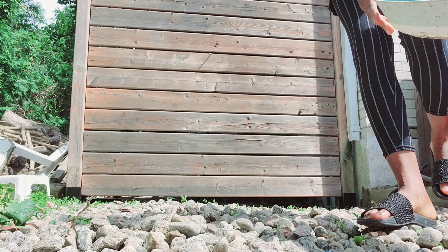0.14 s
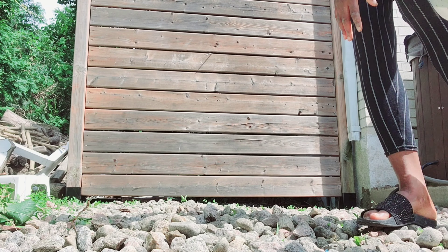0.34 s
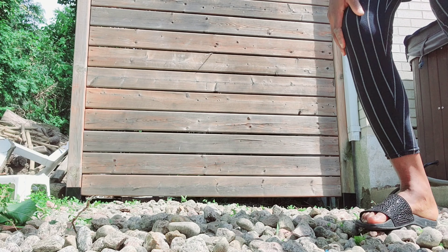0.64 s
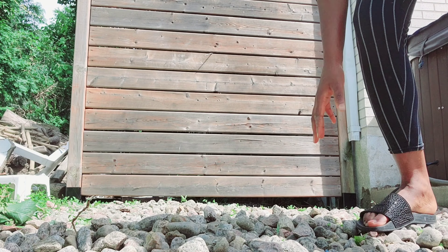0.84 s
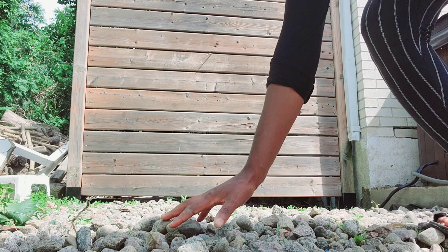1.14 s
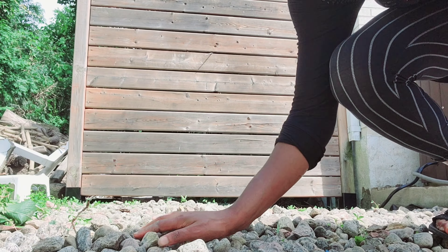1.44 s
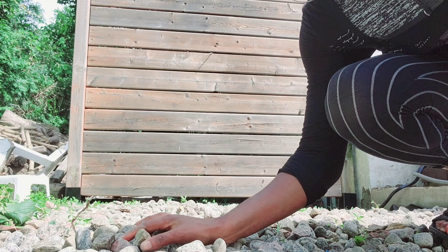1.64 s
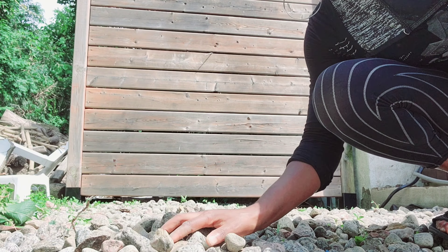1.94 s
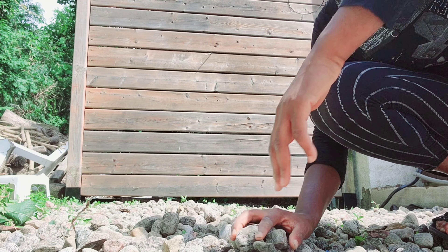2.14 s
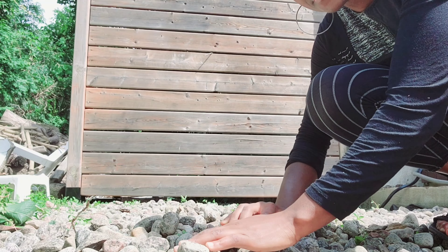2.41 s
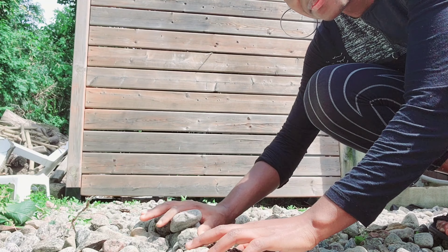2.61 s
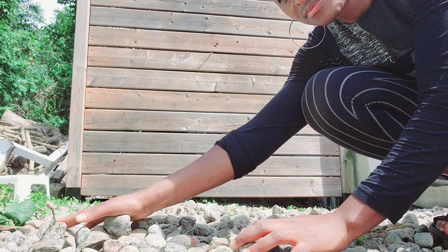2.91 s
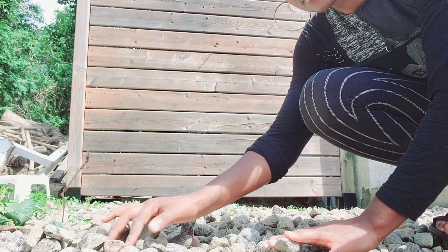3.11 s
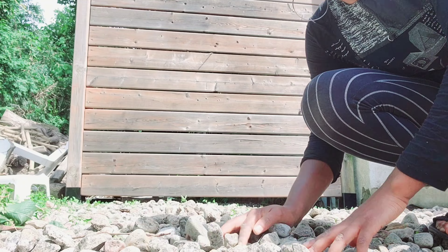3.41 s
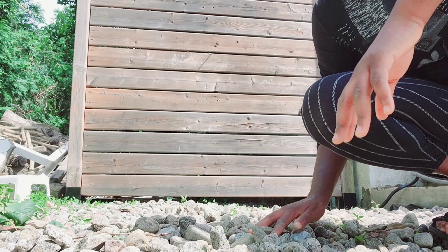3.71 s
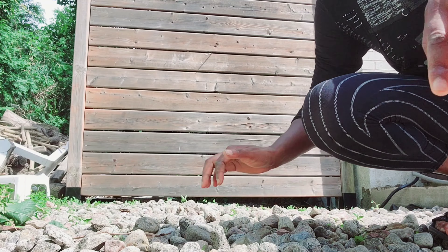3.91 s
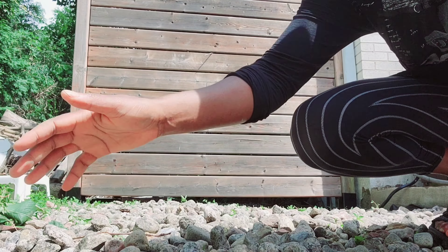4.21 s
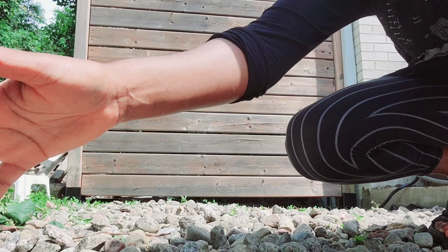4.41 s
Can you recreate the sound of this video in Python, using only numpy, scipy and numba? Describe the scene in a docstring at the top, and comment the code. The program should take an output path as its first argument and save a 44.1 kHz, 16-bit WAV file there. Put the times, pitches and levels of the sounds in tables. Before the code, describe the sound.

Close gravel crunches, a hollow plastic basin knocks down on it, and bare hands sweep the clicking stones before a quiet end outdoors.

```python
"""Gravel, basin and bird

Outdoors, a phone lies on coarse gravel. A sandal shifts the stones, an empty plastic basin is set down and rocks,
then hands rake the stones. A bird whistles once over distant low rumble; later a faint tone sounds.
Stones and basin are decaying sines; grit and air are shaped noise; bird and faint tone are gliding sines.
"""
import sys
import numpy as np
from scipy import signal
from scipy.fft import rfft, irfft, next_fast_len
from scipy.io import wavfile
from scipy.ndimage import uniform_filter1d
from numba import njit

SR = 44100
rng = np.random.default_rng(int(sys.argv[2]) if len(sys.argv) > 2 else 0)


def output_pcm(signal):
    """Save a mono or channel-first signal as 16-bit PCM at the path in sys.argv[1].

    Samples are clipped to [-1, 1] before scaling.
    """
    pcm = np.clip(np.atleast_2d(signal).T, -1, 1) * 32767
    wavfile.write(sys.argv[1], SR, np.round(pcm).astype(np.int16))


N = 200765

# clear stone knocks: start_s (before KNOCK_DELAY_S), level_db, ring_hz,
# tick_minus_level_db (high tick, after the microphone), left_minus_right_db, chatter_minus_level_db, left_lead_ms
KNOCKS = [(0.241, -58, 5500, -25, 3, -12, 0.2), (0.2873, -50.5, 3300, -19.0, 7, -5, 0.27),
          (0.2918, -51.0, 2170.0, -21.0, 3, -14.0, 0.23), (0.3171, -46, 7240.0, -19.0, 7, -14.0, 0.38),
          (0.3436, -38, 5900, -33.0, 7, -19, 0.02), (0.3693, -49, 7260.0, -21.0, 5.0, -12, 0.56),
          (0.3917, -37, 5800, -28.0, 7, -9, 0.02), (0.4058, -40.5, 5930, -29, 12, -8, -0.063),
          (0.4565, -53, 7260.0, -25.0, 12, -17, 0.091), (0.4677, -45.5, 1800, -29.0, 1, 2, 0.33),
          (0.5271, -35.5, 1720.0, -32.0, 4, -20, 0.28), (0.5428, -33.5, 1965, -24.0, 4.5, -22, 0.38),
          (0.5484, -28, 5470, -34.0, 8, -19, -0.026), (0.57, -26, 3450.0, -30.0, 11, -15, -0.31),
          (0.5744, -22, 6240, -31.0, 6, -26, 0.25), (0.585, -16.5, 3240, -37.0, 5.5, -23, 0.26),
          (0.6094, -29, 3250.0, -26.5, 9, -24, 0.49), (0.6185, -30, 3490.0, -28.0, 11, -20, 0.53),
          (0.6427, -7, 5650, -32, 7, -9.5, 0.27), (0.6735, -38.5, 1310.0, -29.0, 10, -8, -0.45),
          (0.7114, -48, 6340, -25.0, 6, -10, -0.14), (0.7514, -38.5, 3600, -33.0, 7, -5, 0.35),
          (0.773, -38.5, 5320.0, -31.0, 3.0, -8, 0.0), (0.7797, -41.5, 3600, -28.0, 6.0, -12, 0.0),
          (0.806, -14, 5200, -32.0, 8, -11, 0.17), (0.8096, -13.5, 5190, -7, 0.5, -6.5, 0.21),
          (0.812, -27, 5200, -27.0, -2, -3, 0.51), (0.8147, -17, 5700, -23.0, 4, -30, 0.32),
          (0.8512, -42, 5210.0, -14, 1, -5, 0.41), (0.8572, -38, 3340, -34, 6, -17, 0.13),
          (0.8612, -38, 1960.0, -26.0, 2.0, -12, 0.24), (0.8646, -39, 3270.0, -31.0, 7, -12, 0.23),
          (0.874, -43, 5510.0, -32.0, -1, -16, 0.2), (0.8791, -34, 3200, -40.0, 6.0, -16, 0.14),
          (0.8836, -38.5, 3120.0, -36.0, 4, -15, 0.34), (0.8994, -47, 3250.0, -29.0, 2, -15, -0.11),
          (0.9248, -42.0, 7600, -37.0, 10, -14.0, 0.07), (0.9372, -33, 4660, -25.0, 4, -3.5, 0.2),
          (0.9468, -37, 7320.0, -38.0, 8, -9, 0.33), (0.9685, -24, 3300, -41.0, 4.5, -19, 0.23),
          (0.9873, -18.5, 5640, -32, 8.5, -14.5, 0.25), (1.0077, -18, 1600, -12, 6, -8.5, -0.079),
          (1.0138, -17, 7700, -16, 23, -23, 0.13), (1.0162, -22, 5660, -20.0, -6.5, -13, -0.12),
          (1.0477, -19.5, 5170, -24.0, 0, -11, 0.062), (1.0559, -25, 1380, -27.0, 7, -10, 0.63),
          (1.0724, -26.5, 1460.0, -25.0, 6.5, -8, 0.6), (1.1015, -22, 3790, -37.0, 2, -6.5, 0.0),
          (1.108, -23, 5640, -39.0, -1.5, -10, -0.54), (1.1508, -31, 4800.0, -22.0, 3.5, -19, -0.02),
          (1.1534, -24, 4800.0, -27.5, 1.5, -12, 0.37), (1.1559, -21, 4720.0, -31.0, 3.5, -14, 0.028),
          (1.1879, -34, 3640.0, -29, 3.5, -11.5, 0.02), (1.1928, -26, 4670.0, -23, 2, -13, 0.02),
          (1.1949, -35, 1875, -25, 4, -13.5, -0.15), (1.2014, -25, 2115, -31, 7.5, -15, 0.33),
          (1.2437, -10, 2083, -24, 2.5, -6.5, -0.15), (1.246, -9.5, 2410, -20, -9.5, -16.5, 0.4),
          (1.2493, -14, 1824, -26.5, -11.5, -19, 0.48), (1.259, -12.5, 2097, -37.5, 12, -11.5, -0.057),
          (1.2754, -13.5, 1470, -43.5, 4, -12.5, 0.52), (1.2937, -17, 1480, -40.0, 0.5, -15.5, 0.71),
          (1.3185, -27, 1470, -28.0, 0.5, -19, -0.064), (1.3194, -31, 1410, -30.0, 3.5, -12, 0.73),
          (1.33, -31, 1890.0, -32, 5, -14.0, 0.27), (1.3667, -10.5, 1745, -37, 13.5, -8.5, 0.23),
          (1.3954, -24.5, 3260, -29.0, 23, -12, 0.36), (1.4005, -23, 4960, -31.0, -8, -21, 0.0),
          (1.4036, -20, 5330, -28.0, 3.5, -9.5, 0.17), (1.4082, -27, 1340.0, -31.0, 7, -21, 0.68),
          (1.4141, -25.5, 4030, -30, 6.0, -22, -0.25), (1.4375, -24.5, 2090, -34.0, 8, -29, 0.26),
          (1.4475, -21, 1340.0, -34.0, 4, -19, 0.37), (1.4582, -21.5, 1470, -33.0, 10, -19, -0.089),
          (1.5002, -32, 2040, -41.0, 6, -11, 0.38), (1.5077, -29, 1810.0, -36.0, 6, -1.5, 0.14),
          (1.5116, -34.5, 1540, -35.0, 4, -2, 0.4), (1.5265, -40, 2370, -37.0, 4, -11, 0.085),
          (1.531, -35.5, 2200.0, -40.0, 3, -5, 0.58), (1.5389, -37, 2220.0, -40.0, 11, -19, 0.45),
          (1.5432, -41, 1420.0, -38.0, -2, -16, 0.56), (1.5663, -35, 1310.0, -30.0, 5, -13, 0.54),
          (1.5711, -48, 1310.0, -34.0, 11, -17, -0.52), (1.5974, -42, 2000, -37.0, 11, -6, 0.53),
          (1.6017, -43.5, 1340.0, -36, 2, -12, 0.3), (1.6097, -36, 1360.0, -34.0, 7, -10, -0.33),
          (1.615, -39, 1380.0, -32.0, 9, -9, -0.51), (1.6285, -42, 5190.0, -36.0, 0.0, -18, 0.021),
          (1.6478, -30.5, 1600, -40.0, -0.5, -4.5, 0.12), (1.6557, -24, 4870.0, -43, 4.0, -23, 0.0),
          (1.6575, -27, 3740, -29.5, 9, -17, -0.41), (1.6605, -37.5, 5660, -26, 5, -16, 0.044),
          (1.6875, -8, 7500, -17.5, 1, -11.5, 0.0), (1.7126, -27, 1680.0, -27.5, 5, -29, -0.14),
          (1.7189, -25.5, 1680.0, -34, -3, -18.5, -0.11), (1.723, -34, 3700, -34.0, 3, -18, 0.3),
          (1.7376, -30.5, 1680.0, -38.0, -1, -18, -0.063), (1.7412, -26, 3060, -38.0, -7, -18, -0.025),
          (1.7439, -25.5, 3500, -37.0, 9, -19, 0.15), (1.7461, -40, 4940, -32.0, 1, -20, -0.17),
          (1.7486, -36, 3120.0, -38.0, 1.0, -14.0, 0.3), (1.7626, -37, 5510.0, -32.0, 0, -21, 0.56),
          (1.771, -27.5, 3640.0, -39.0, -2, -6, 0.12), (1.7738, -26.5, 1570.0, -37.0, -1, -13.5, 0.24),
          (1.7924, -40, 5400, -36.0, 1.0, -14.0, -0.02), (1.7993, -43, 5510.0, -31.0, 0, -14.0, -0.23),
          (1.8056, -40, 5300, -29.0, -6, -14.0, -0.084), (1.8095, -36, 5490.0, -25.0, -1, -16, 0.1),
          (1.8231, -31, 2800.0, -34.0, 2.0, 3, 0.059), (1.8327, -19, 5500, -36.0, -0.5, -10, -0.02),
          (1.8353, -21.5, 5500, -37.0, 7, -21.5, 0.0), (1.8464, -28, 1610.0, -33.0, -5, -17, -0.52),
          (1.8505, -20, 5810.0, -31.0, 8, -8.5, -0.028), (1.8613, -22.5, 5030, -31.0, -4, -12, 0.017),
          (1.8648, -22.5, 5360.0, -27.0, 0, -15.5, -0.24), (1.8696, -37.5, 2330, -34.0, -3, -18, 0.0),
          (1.8801, -29, 5320, -36.0, 6.5, -2, 0.0), (1.8849, -26, 3830.0, -22.0, 11, -7, 0.26),
          (1.8932, -25, 5230, -29.0, 1, -14, -0.4), (1.8956, -23, 5400, -31.0, 0, -9, 0.0),
          (1.8985, -21, 5230.0, -34.0, -7, -11, -0.05), (1.9042, -16, 6330.0, -26.0, 12, -12, -0.16),
          (1.91, -17, 5540, -30.0, 3.0, -19, -0.0039), (1.9126, -15, 4400, -34.0, -2, -26, 0.0),
          (1.9161, -13, 5300.0, -25.0, -4, -25, 0.46), (1.9353, -17.5, 5420, -28.0, 13.5, -7, 0.52),
          (1.9542, -9, 5470.0, -36.0, -18, -56, -0.07), (1.9589, -18.5, 5550, -32.5, 17, -18, -0.26),
          (1.9852, -22, 5020.0, -31.0, -4, -10.5, 0.32), (2.0014, -20.5, 7020.0, -24.0, 4.5, -12, 0.09),
          (2.0044, -12, 4930, -34.0, 4, -5.5, 0.05), (2.0165, -15, 4770, -28.0, 4, -10, 0.1),
          (2.0204, -14, 5400, -30.0, 1, -11.5, 0.05), (2.0485, -18.5, 2990.0, -45.0, 0.5, -9, 0.097),
          (2.0536, -20.5, 4800.0, -37.0, 4, -14.0, 0.09), (2.0639, -17, 3190.0, -35.0, 9.5, -15, 0.047),
          (2.0745, -9, 5350, -37, 2, -21.5, 0.11), (2.0768, -10, 4800, -24, 2, -7, 0.09),
          (2.1071, -25, 3600.0, -36.0, -2, -5, -0.0067), (2.1092, -17.5, 3140, -39.0, 7, -27, 0.081),
          (2.1117, -16.5, 7100, -34.0, 7, -9.5, 0.017), (2.1153, -23, 5370, -26.0, -2, -10, 0.09),
          (2.1211, -16.5, 2180, -43.0, 4, -8.5, 0.11), (2.1534, -23.5, 1420.0, -40.0, 3, -14.0, 0.26),
          (2.1568, -33.5, 5360.0, -32.0, 3.0, -22, 0.0092), (2.1624, -33.5, 2480.0, -36.0, 11, -7, 0.14),
          (2.1671, -28.5, 1480, -34.0, -2, -2, 0.18), (2.1732, -42, 2580.0, -38.0, 0, -19, 0.39),
          (2.1822, -42, 2540.0, -45.0, 9, -13, -0.2), (2.1851, -41, 2390.0, -40.0, 1, -19, -0.33),
          (2.1981, -32, 2050.0, -40.0, 3.0, -14.0, 0.2), (2.2001, -44, 2890.0, -42.0, 3.0, -14.0, 0.27),
          (2.2142, -40, 3100.0, -32.0, 3, -14.0, 0.04), (2.2242, -22, 5380.0, -27.0, 2.5, -10, 0.13),
          (2.2445, -29.5, 5400, -36.0, 5, -14.0, 0.11), (2.2702, -30, 2700, -29.0, 6, -16, 0.17),
          (2.2766, -31.5, 4260.0, -27.0, 2, -15, 0.27), (2.2875, -27.5, 7560, -24.0, 9, -16, 0.07),
          (2.3015, -30, 3220, -37.0, 1, -7, -0.071), (2.3094, -24.5, 3080, -42.0, 9, -26, 0.097),
          (2.3289, -19.5, 5300, -34.0, 7.5, -24, 0.11), (2.3469, -17, 2950, -39.0, -1.5, -5, 0.23),
          (2.3494, -16, 5300, -31, 7.5, -10.5, -0.29), (2.357, -22.5, 3000, -42.0, 13.5, -31, 0.11),
          (2.3753, -23.5, 6000, -33.0, 1, -6, 0.44), (2.3783, -28, 5940.0, -37.0, 6, -14.0, 0.12),
          (2.3901, -21, 5760, -32.0, 4.0, -17, 0.32), (2.4051, -18, 4800, -40.0, 5, -29, 0.02),
          (2.4078, -15, 1640, -35.0, -5, -12.5, 0.2), (2.416, -7, 4740, -45, 5.5, -27.5, -0.099),
          (2.4269, -20, 2650, -38.0, 5, -4, 0.091), (2.4411, -16.5, 2980, -41.0, 2.0, -8, 0.18),
          (2.4463, -19.5, 3020, -29.0, 5, -5, 0.061), (2.462, -12, 5200, -33, 4, -14, 0.0),
          (2.469, -26, 7000, -16, 2, -8, 0.0), (2.488, -5, 5350, -32, 2, -10, -0.076),
          (2.498, -27, 2950, -24.0, -1, -13, -0.021), (2.5131, -20, 5040.0, -26.0, -1.5, -1.5, -0.02),
          (2.5204, -21, 7450.0, -30.0, 1.5, -22, 0.16), (2.5443, -35.5, 3900.0, -26.0, -4, -12, 0.0),
          (2.5697, -13.5, 5830, -0.5, 6.5, -9.5, 0.16), (2.596, -19, 5200, -30, 1, -6.5, -0.3),
          (2.6011, -19.5, 3100, -27.0, 6, -8.5, -0.042), (2.6067, -18.5, 5920, -35.0, 2, -13.5, -0.026),
          (2.6103, -26.5, 4390.0, -32.5, 4, -12.5, -0.11), (2.6286, -28, 1555, -34.5, 1.0, -11, -0.24),
          (2.6321, -27, 5900, -25, 5, -25.5, 0.07), (2.6595, -20, 2600, -22.0, 2.0, -12.5, 0.067),
          (2.6721, -7.5, 6000, -25, -1.5, -19.5, 0.0), (2.6846, 0.5, 6270, -18.5, 10.5, -10.5, -0.085),
          (2.6921, -5, 5600, -21.5, -5.5, -12, -0.07), (2.7019, -17.5, 5000, -24, 2, -12, 0.0),
          (2.7055, -23, 5800, -26, 2, -9, 0.0), (2.741, -36, 2110.0, -28.0, 0.0, -16, 0.0),
          (2.746, -45, 2280.0, -14.0, 1, -14.0, -0.041), (2.7481, -37, 1400.0, -24.0, 1.5, -5, -0.056),
          (2.7782, -20.5, 5640, -26, 3, -6.5, -0.09), (2.8015, -29, 4610.0, -37.0, 3, -9, -0.02),
          (2.8202, -13.5, 5310, -31, 2.5, -10.5, 0.09), (2.8256, -26.5, 5580, -34.0, 1, -14, -0.13),
          (2.828, -22.5, 4140, -30.0, 1, -17, 0.13), (2.8596, -18.5, 4910.0, -31.0, -0.5, -17, -0.11),
          (2.8676, -27, 7180, -28.0, 18, -14.5, 0.45), (2.8731, -27.5, 4910, -26.0, 1.5, -21, -0.029),
          (2.882, -28, 5510.0, -17.0, 3.5, -14.0, -0.19), (2.887, -22.5, 5380.0, 14, 0, -21.5, -0.34),
          (2.8998, -26.5, 4570.0, -27.0, -1, -18, 0.077), (2.9058, -21.5, 5560.0, -27.0, 3, -6, -0.00029),
          (2.911, -12.5, 4430, -0.5, 4, -18, 0.14), (2.9158, -19, 3400.0, -35.0, 7.5, -16.5, 0.15),
          (2.9246, -21.5, 5510.0, -30.0, 2.5, -3, -0.07), (2.9491, -20, 3730.0, -29, 1.0, -14, 0.051),
          (2.9509, -23, 5120, -31.0, 0, -14.5, 0.23), (2.9594, -24, 4240.0, -35.5, 11, -9, -0.28),
          (2.965, -21.5, 750, -45, 1.5, -17.5, 0.0), (2.9716, -28.5, 2250, -33.0, 2.5, -18, -0.14),
          (2.977, -21, 4820.0, -28.0, -2.5, -16, -0.09), (2.9838, -19.5, 5640.0, -37.0, 1, -15, -0.11),
          (2.9907, -22.5, 4800, -29, 4.5, -14.5, 0.19), (3.0074, -18.5, 5620.0, -34.5, 8.5, -23.5, 0.094),
          (3.0217, -30.5, 5340.0, -25, 7, -17, -0.004), (3.0323, -40.5, 5840.0, -34, 1, -13.5, -0.24),
          (3.0377, -32.5, 5080.0, -22.5, 7, -20.5, -0.07), (3.046, -34.5, 4500, -37, 2, -15, 0.0),
          (3.0599, -10.5, 5230.0, -28.5, 4.5, -20, -0.078), (3.062, -8.5, 5560, -33.5, -0.5, -20.5, -0.02),
          (3.0666, -16, 5990.0, -23.5, -1.5, -16, -0.17), (3.0791, -6.5, 5680, -24, -6.5, -14.5, 0.16),
          (3.0907, -15, 4820.0, -24.5, 4, -16.5, 0.015), (3.1055, -21.5, 5530.0, -31, 3.5, -17, 0.0),
          (3.1118, -27, 4220, -32, 1.5, -14.5, -0.05), (3.1215, -23.5, 5570, -26, 1, -14.5, -0.05),
          (3.137, -21.5, 5200, -34, 0, -13.5, 0.0), (3.144, -26, 5400, -34, 0, -14, 0.0),
          (3.1531, -4, 4870.0, -43, -1, -21, 0.0), (3.1664, -13.5, 5770.0, -27, 5, -13, 0.0),
          (3.1787, -16, 4820, -29.5, 1, -12.5, 0.2), (3.1822, -16, 5960.0, -27.5, 0, -15.5, 0.0),
          (3.1893, -14, 3750.0, -22.5, 1, -13, 0.0), (3.2015, -13, 4810, -34.5, 5, -12, 0.095),
          (3.2065, -18, 4600, -36.0, 6.5, -15.5, -0.4), (3.2207, -21, 4440.0, -25, 1.5, -9, 0.09),
          (3.2239, -26, 1360.0, -23.0, 0, -15, -0.07), (3.2308, -33, 2220.0, -32.0, 0.5, -14.0, 0.09),
          (3.2337, -28.5, 3040.0, -34.0, 8, -14.5, 0.11), (3.2382, -28, 3570.0, -31.0, 6.5, -14, 0.098),
          (3.2598, -28, 2300, -40.0, 2, -8, -0.038), (3.2624, -26, 4560, -41.0, 5.5, -19.5, 0.05),
          (3.2671, -31.5, 4520.0, -18.0, 5, -18, -0.37), (3.284, -31.5, 5600.0, -39.0, 3.5, -11, 0.34),
          (3.2874, -27, 5695, -36, 0, -15, 0.0), (3.2895, -24, 5600.0, -34.0, 2.5, -8, -0.065),
          (3.2987, -28, 5600.0, -33.0, 2.5, -12.5, 0.016), (3.3009, -31.5, 5710.0, -29.0, 9, -14.0, -0.029),
          (3.3083, -28, 2040, -33.0, 7, -20, 0.18), (3.3105, -17.5, 4870.0, -29.0, 5, -13, -0.12),
          (3.3138, -27, 5520, -30.0, 1.5, -17, 0.02), (3.3336, -31, 1590.0, -35.0, 1, -7, -0.086),
          (3.3424, -33, 2780.0, -43, 0, -2, 0.009), (3.3465, -25.5, 2480.0, -46.0, 2, -5, 0.1),
          (3.3535, -34, 2390.0, -37.0, 2.0, -16, 0.0039), (3.3554, -30.5, 2450.0, -33.0, 2, -14.0, 0.049),
          (3.358, -32.0, 2030, -35.0, 5, -11, 0.11), (3.3748, -29, 3040, -34, 1, -2, -0.02),
          (3.3916, -34, 2340, -37.0, 1, 8.5, -0.13), (3.4, -16.5, 7300, -23, 5, -25, 0.05),
          (3.4205, -17, 4650, -28.0, 1, -4.5, 0.07), (3.4258, -22.5, 3040.0, -30, 7, -22, -0.68),
          (3.4556, -21, 2200.0, -49.0, 0.0, -8, -0.047), (3.4632, -32, 3780, -42.0, 5.0, -18, 0.02),
          (3.4867, -29.5, 2170.0, -37.0, 5, -7, 0.087), (3.4976, -24.5, 5710.0, -28.0, 6, -8.5, 0.05),
          (3.4999, -29, 2330.0, -28.0, 11, -16, 0.19), (3.5027, -27, 4870.0, -32.0, 3.0, -14.0, 0.1),
          (3.5188, -26, 2480, -29.0, 1, -17, 0.17), (3.5226, -21, 3230, -41.0, 10.5, -5.5, -0.27),
          (3.548, -32.5, 2400, -34.0, 8, -12, 0.072), (3.5634, -16, 5600, -38, 1.5, -2, 0.09),
          (3.5679, -38, 5340, -30.0, 1, -15, 0.44), (3.5709, -22.5, 5460, -29, 6.5, -13.5, -0.17),
          (3.5924, -25.5, 3680, -37.0, 2, -11, 0.11), (3.6007, -43, 3060.0, -33.0, 2, -14, 0.086),
          (3.6052, -34, 4850, -25, 3, -6, 0.66), (3.6104, -33.5, 6100, -25.0, 8, -16, 0.0),
          (3.6358, -54, 2540.0, -30.0, 2, -17, 0.2), (3.6622, -53, 3790.0, -31.0, 7, -14.0, -0.23),
          (3.7109, -44.5, 2300, -56.0, 2.5, 2.5, -0.004), (3.7155, -40, 2160, -51.0, 11, -25, -0.21),
          (3.7463, -59, 1380.0, -35.0, 4.0, -14.0, 0.11), (3.7574, -46, 1490.0, -32.0, 7.5, -20, 0.039),
          (3.7595, -55.0, 1380.0, -36.0, -1, -16, 0.0), (3.777, -47, 2220.0, -41.0, 5.0, -17, 0.0076),
          (3.7894, -40.5, 2500, -39.0, 5, -13, 0.17), (3.7963, -49, 5600, -31.0, 6, -1, 0.11),
          (3.8172, -47, 1310.0, -35.0, 5, -14.0, 0.0039), (3.83, -45.5, 2200.0, -41.0, 1, -19, 0.098),
          (3.8335, -60, 2110.0, -37.0, 5.0, -14.0, 0.02), (3.8358, -52, 2150.0, -37.0, 15, -18, 0.36),
          (3.8498, -49.5, 1420.0, -37.0, 1, -20, 0.054), (4.2718, -53.5, 3350, -23, 6, -16, -0.028),
          (4.3183, -56, 5160, -22.5, 3.0, -6, -0.012), (4.4286, -59, 5700, -21, 0, -14.0, 0.2),
          (4.4631, -46, 5540, -17, 10, -10, 0.0), (4.4763, -39, 3400, -35, 4, -30, -0.073),
          (4.5081, -52, 1930, -36, 11, -11, 0.23), (4.5161, -50, 2480.0, -30, 3.5, -16, 0.21),
          (4.5313, -50.0, 5680.0, -29.0, 1.0, -6, 0.44), (4.5384, -45, 5190.0, -27.0, 3.0, -14, 0.34)]
# blows on the basin: start_s, level_db, hardness_db_per_octave, spot_db (drive of second minus first rim mode),
# pitch_shift_percent (pressed shell)
BLOWS = [(1.006, -22.5, -4.5, 1.5, 1.5), (1.053, -32, -3.5, -9.5, 2.3), (1.1, -35, -1.5, -8, 4.5),
         (1.233, -30.5, 3, -17.5, -4.5), (1.2437, -21.5, 6.5, 2.5, -0.5), (1.258, -30.5, -3.5, -14.5, 0),
         (1.276, -31.5, 7.5, 2, 0.1), (1.294, -26.5, 3.5, -22, -1.6), (1.349, -23.5, -5.5, -5, -1.5),
         (1.366, -22.5, -7, -4, 0.1), (1.396, -36, -8, -17, 2), (1.438, -29, 0.4, 12, -0.45),
         (1.459, -35.5, -0.5, -6, -0.5), (1.505, -41, -10.5, -12, 1.7), (1.527, -37, 0, 9, 1),
         (1.567, -42.5, -1, 7, 2.5)]
# basin modes: pitch_hz, level_db, free_t60_s, left_lead_ms, rim_side (-1 first of the pair, 1 second)
BASIN_MODES = [(150, -16.5, 0.032, .3, -0.36), (222, -9, 0.041, 0.33, 0), (491, -7, 0.32, 0.54, -1),
               (878, -2, 0.26, 0.47, 1), (581.4, -5, 0.092, 0.18, 0), (657, -12, 0.063, 0.54, 0),
               (900, -14.5, 0.18, 0.64, 1), (1309, -9.5, 0.073, 0.32, 0), (1474, -2.5, 0.09, 0.49, 0.23),
               (1600, -14, 0.026, 0.24, 0), (1820, -8, 0.1, .52, 0), (1950, -7, .05, 0.52, 0),
               (2090, 6.5, 0.017, .6, 0), (2250, -15, .05, .45, 0), (2960, -16, 0.03, .4, 0),
               (2430, -16, 0.08, 0.55, 0)]
# bird whistle: time_s, pitch_hz, level_db
BIRD = [(0.512, 8500, -68), (0.53, 8600, -60), (0.58, 8660, -63), (0.635, 8700, -48), (0.67, 9060, -55),
        (0.73, 8700, -59), (0.8, 8690, -56), (0.86, 8600, -59), (0.895, 8550, -60), (0.925, 7740, -57),
        (0.952, 7200, -49), (0.985, 7440, -52)]
# faint tone: time_s, pitch_hz, level_db
FAINT_TONE = [(3.76, 1080, -67), (3.8, 1044, -63), (3.83, 1035, -80), (3.87, 1031, -67), (3.95, 1037, -68),
              (4.03, 1034, -70)]
# spectrum of the air, relative: freq_hz, density_db (per Hz)
AIR_SPECTRUM = [(12, -41), (30, -7), (42, -5.5), (86, -3.5), (121, -8.5), (156, -17), (492, -28.5),
                (709, -34.5), (863, -35.5), (966, -33.5), (1180, -40), (2730, -40.5), (7730, -54),
                (9500, -63), (16500, -60.5)]
# microphone response: freq_hz, gain_db
MIC = [(100, -5), (1000, 0.5), (3000, 0.5), (4500, 2.5), (5800, 6.5), (7000, 0.5), (8000, 1.5),
       (8700, -2.5), (12000, -0.5), (16000, 4.5)]
# where sandal, basin, then hands move the stones: time_s, left_minus_right_db, left_lead_ms
WHERE = [(0, 7, 0.63), (.95, 2, 0.17), (1.002, 13, 0.046), (1.199, 4.5, 0.22), (1.248, 5.5, 0.49),
         (1.549, 4.5, 0.46), (1.62, 3, 0.034), (2.1, 3, 0.028), (2.7, 1.5, -0.045), (3.2, 2, -0.052),
         (3.6, 2.5, 0.047), (4.55, 8, 0.34)]
# pushes of sandal, basin and hands: start_s, length_s, rattle_start_db, rattle_end_db,
# grind_minus_rattle_db, grit_minus_rattle_db
STROKES = [(0.276, 0.19, -70.5, -73, -12, -2), (0.549, 0.12, -45.5, -46, 11, -4),
           (0.788, 0.16, -48.5, -68.5, 4.5, -3), (0.948, 0.11, -57.5, -41.5, -8.5, -10),
           (1.091, 0.13, -54.5, -44.5, 7, -10.5), (1.248, 0.013, -27, -51.5, 7.5, -2.5),
           (1.309, 0.14, -35.5, -35, 2, -21), (1.471, 0.11, -52.5, -58, 19, -23),
           (1.631, 0.11, -42, -31.5, -0.5, -40.5), (1.796, 0.12, -36, -32.5, 0.5, -26),
           (1.93, 0.18, -34.5, -29.5, -9, -26), (2.13, 0.25, -51.5, -45.5, 7, -31),
           (2.326, 0.19, -35, -35, -2, -38), (2.543, 0.085, -35.5, -34.5, 1, -15),
           (2.67, 0.051, -35.5, -41.5, 4.5, -4.5), (2.742, 0.17, -44, -42.5, 5, -38),
           (2.88, 0.0098, -40, -32, -8.5, 1.5), (2.922, 0.055, -39, -35, 5.5, -28),
           (3.065, 0.06, -25, -33, -3.5, -23.5), (3.141, 0.079, -32.5, -33.5, -2, -24),
           (3.259, 0.31, -36.5, -47, -1, -44), (3.442, 0.16, -53, -48, -1, -14.5),
           (3.689, 0.13, -69.5, -69, 9.5, -29), (4.429, 0.13, -86, -59, 4, -17)]

AIR_RMS_DB = -44.5
MAX_RATTLE_LEAD_S = 0.00028  # limit of left-right time offset for the fine rattle
THUD_DB, THUD_DB_PER_DB = -46.5, 0.52  # thud under a -24 dB knock; its growth with the knock
KNOCK_DELAY_S = 0.001003  # added to the table times
STONE_TOP_HZ, LONGEST_RING_S = 7480, 0.006  # about the highest ring of stones this size
RING_CYCLES, STRAY_SPREAD_DB = 12., 1.8
ONSET_S, SETTLE_T60_S = 0.026, 0.18  # a push swells 20 dB in ONSET_S
STILL_DB = -80.5  # the bed never quite rests
THUMP_DB = 15.5  # ground thump minus blow
PITCH_SPREAD = .0012  # fraction, from blow to blow
FREE_S, HELD_RING = 1.2, 0.7  # until FREE_S the hand grips the basin; its rings last this share
WET_DB, TOP_HZ = -12, 15950


def undb(db):
    """Amplitude from dB."""
    return 10 ** (np.asarray(db) / 20)


def curves(table):
    """Columns of a table as sample-rate curves."""
    s, *columns = np.transpose(table)
    return [np.interp(np.arange(N) / SR, s, c) for c in columns]


def colour(x, points):
    """Shape a spectrum by (freq_hz, gain_db) points."""
    n = next_fast_len(N + 4096)
    hz, db = np.transpose(points)
    bin_hz = np.arange(n // 2 + 1) * SR / n
    gain = undb(np.interp(np.log(bin_hz + 1), np.log(hz), db))
    return irfft(rfft(x, n) * gain, n)[..., :N]


def walk(rate_hz):
    """Random levels held 1 / rate_hz, slewed twice."""
    k = int(SR / rate_hz)
    steps = np.repeat(rng.standard_normal(N // k + 1), k)
    return 3.4 * uniform_filter1d(uniform_filter1d(steps, k), k)[:N]


@njit
def rings(n, start, hz, t60, size, rise):
    """Sum of decaying sines, each begun between two samples and swelling while the contact lasts."""
    out = np.zeros(n)
    for k in range(len(start)):
        pole = 2j * np.pi * hz[k] / SR - np.log(1000) / (t60[k] * SR)
        i = int(np.ceil(start[k] * SR))
        z = size[k] * np.exp(pole * (i - start[k] * SR))
        p = np.exp(pole)
        gap, q = 1., np.exp(-1 / (rise[k] * SR))
        for j in range(max(i, 0), min(n, i + int(t60[k] * SR))):
            gap *= q
            out[j] += z.imag * (1 - gap)
            z *= p
    return out


def heard(s, hz, t60, db, pan_db, lead_s, rise_s):
    """Rings at two ports, offset in time and level; positive lead_s and pan_db favour the left."""
    columns = np.broadcast_arrays(s, hz, t60, db, pan_db, lead_s, rise_s)
    s, hz, t60, db, pan_db, lead_s, rise_s = (1. * v.ravel() for v in columns)
    hz = np.clip(hz, 40, .45 * SR)
    t60 = np.clip(t60, 3e-4, 2)
    rise_s = np.clip(rise_s, 1e-5, 1)
    return np.array([rings(N, s - e * lead_s, hz, t60, undb(db + e * pan_db), rise_s) for e in (.5, -.5)])


def knocks(count=3, length_s=0.003):
    """A sharp contact, a thud into the bed, and the chatter of the stone as it rocks to rest."""
    start_s, db, hz, tick_db, pan_db, chatter_db, lead_ms = np.transpose(KNOCKS)[:, :, None]
    c = rng.standard_normal((len(start_s), 1 + 2 * count))
    u = rng.random((len(start_s), count))
    s = start_s + KNOCK_DELAY_S
    tick_db = tick_db - np.interp(11500, *np.transpose(MIC))  # undo the microphone gain
    lead_s = lead_ms / 1000
    blow = contacts(s, db, hz, tick_db, pan_db, lead_s, cycles=RING_CYCLES, stray_db=-2.0, snap_db=1.5)
    thud_hz = np.array([280, 700, 1100]) * 2 ** (0.53 * c[:, :1])
    thud_db = THUD_DB + THUD_DB_PER_DB * (db + 24)
    thud_lead_s = 0.00046 * np.interp(s, *np.transpose(WHERE)[::2])
    thud = heard(s, thud_hz, 0.013, thud_db, pan_db, thud_lead_s, 0.00064)
    # mostly after the blow, a few faint clicks just before it
    after_s = length_s * (2.2 * u - .35)
    fade_db = db + chatter_db + 4.0 - 5 * np.abs(after_s) / length_s + 2.0 * c[:, 1:1 + count]
    chatter_hz = hz * 2 ** (0.3 * c[:, 1 + count:1 + 2 * count])
    chatter = contacts(s + after_s, fade_db, chatter_hz, tick_db, pan_db, lead_s,
                       cycles=1.3, stray_db=5.0, snap_db=-5.0)
    return blow + thud + chatter


def contacts(s, db, hz, tick_db, pan_db, lead_s, cycles, stray_db, snap_db):
    """Stone on stone: a brief snap, a short ring, stray and mostly lower rings of the other stone, a high tick."""
    c = rng.standard_normal((s.size, 5)).T.reshape((5,) + s.shape)
    snap_hz = 3930.0 * (hz / 4000) ** 0.23
    snap = heard(s, snap_hz, 0.00093, db + snap_db, pan_db, lead_s, .00004)
    ring = heard(s, hz, np.minimum(cycles / hz, LONGEST_RING_S), db + 3, pan_db, lead_s, 0.00015)
    stray_hz = np.minimum(hz * 2 ** (0.44 * c[0] + 0.3), STONE_TOP_HZ * 2 ** (0.042 * c[2]))
    stray = heard(s, stray_hz, 0.0028, db + stray_db + STRAY_SPREAD_DB * c[1], pan_db, lead_s, .0001)
    body_db = db + stray_db - 8.5 + STRAY_SPREAD_DB * c[4]
    body = heard(s, hz * 2 ** (.3 * c[3] - .8), 0.0032, body_db, pan_db, lead_s, 0.0003)
    tick = heard(s, 11500 * 2 ** (0.2 * c[2]), 0.0012, db + tick_db, pan_db, lead_s, .00003)
    return snap + ring + stray + body + tick


def rattle(count=7500):
    """Many small contacts in uneven bunches; the bed grinds dully, rumbles in the ground, and grit hisses."""
    level_db, grind_db, grit_db = strokes()
    pan_db, lead_ms = curves(WHERE)
    u, c = rng.random((count, 3)), rng.standard_normal((count, 7))
    i, j = (u[:, :2].T * (N - 1)).astype(int)
    bunch_db = 1.1 * walk(42.0)
    # many weak contacts, few strong
    spread_db = np.minimum(-3.8 * (np.log(1 - u[:, 2]) + 1.08), 8)
    fine_hz = np.minimum(3600 * 2 ** (0.69 * c[:, 1]), STONE_TOP_HZ * 2 ** (0.042 * c[:, 5]))
    fine_lead_s = MAX_RATTLE_LEAD_S * np.tanh(0.13 + 0.32 * c[:, 0])
    fine = contacts(i / SR, level_db[i] + bunch_db[i] + spread_db, fine_hz, -18 + 3 * c[:, 5],
                    pan_db[i] + 3 * c[:, 2], fine_lead_s, 14 * 2 ** (0.3 * c[:, 6]),
                    stray_db=-18.0, snap_db=6.5)
    grind = heard(j / SR, 800 * 2 ** (0.8 * c[:, 3]), 0.012, grind_db[j] + 1.2 * c[:, 4],
                  pan_db[j], lead_ms[j] / 1000, 0.00073)
    rumble_db = -52.0 + 1.1 * (grind_db[j] + 41.5)
    rumble = heard(j / SR, 80 * 2 ** (0.73 * c[:, 4]), 0.089, rumble_db, pan_db[j], 0.0001, 0.0035)
    hiss = colour(rng.standard_normal((2, N)), [(1000, -19.5), (4000, 9.5), (9000, 6.5), (16000, -12.0)])
    hiss_db = grit_db + 0.33 * bunch_db + 2.0 * walk(130)
    grit = hiss * undb(hiss_db + np.array([pan_db, -pan_db]) / 2)
    return fine + grind + rumble + grit


def strokes():
    """Rattle, grind and grit levels in dB: every push swells, holds its slope and dies away; their powers add."""
    t = np.arange(0, N, 64) / SR
    s, length, start_db, end_db, grind_db, grit_db = np.transpose(STROKES)[:, :, None]
    held_db = start_db + (end_db - start_db) * np.clip((t - s) / length, 0, 1)
    swell_db = 20 * np.maximum(s - t, 0) / ONSET_S
    settle_db = 60 * np.maximum(t - s - length, 0) / SETTLE_T60_S
    push_db = held_db - swell_db - settle_db

    def total(db):
        """Power sum over the pushes and the still bed."""
        power = np.sum(undb(db) ** 2, axis=0) + undb(STILL_DB) ** 2
        return np.interp(np.arange(N) / SR, t, 10 * np.log10(power))

    return total(push_db), total(push_db + grind_db), total(push_db + grit_db)


def basin():
    """Blows ring the shell's modes, a hard one the upper modes more, and thump the ground; it stands to the left."""
    s, db, hard_db, spot_db, shift = np.transpose(BLOWS)[:, :, None]
    hz, mode_db, t60, lead_ms, pair = np.transpose(BASIN_MODES)
    c = rng.standard_normal((len(s), 2, len(hz)))
    ring_db = db + mode_db + 0.88 * c[:, 0] + hard_db * np.log2(hz / 800) + pair * spot_db / 2
    # the rocking shell bends a little, so no two blows give quite the same pitch
    bent_hz = hz * (1 + shift / 100 + PITCH_SPREAD * c[:, 1])
    ring_t60 = t60 * np.where(s < FREE_S, HELD_RING, 1)
    shell = heard(s, bent_hz, ring_t60, ring_db, 8.5, lead_ms / 1000, 0.000071)
    thump = heard(s, 420.0, 0.007, db + THUMP_DB, 1.6, 0.00015, 0.00035)
    return shell + thump


def scatter(x, t60, wet_db):
    """Neighbouring stones, fence and legs throw back a short dense tail of treble, unlike at the two ports."""
    t = np.arange(int(.15 * SR)) / SR
    envelope = np.exp(-np.log(1000) * t / t60) * np.minimum(t / 0.00019, 1)
    tail = rng.standard_normal((2, len(t))) * envelope
    tail *= undb(wet_db) / np.sqrt(np.sum(tail ** 2, axis=1, keepdims=True))
    wet = signal.fftconvolve(x, tail, axes=1)[:, :N]
    return x + colour(wet, [(100, -14.0), (700, 0.5), (2500, 8.5), (16000, 8.5)])


def tone(table, waver, flicker_db, pan_db):
    """A gliding, slightly husky sine that fades in and out at its ends."""
    hz, db = curves(table)
    t = np.arange(N) / SR
    edge = np.clip(np.minimum(t - table[0][0], table[-1][0] - t) / 0.0053, 0, 1)
    size = np.sqrt(2) * edge * undb(db + flicker_db * walk(270))
    phase = 2 * np.pi * np.cumsum(hz * (1 + waver * walk(180))) / SR
    return size * np.sin(phase) * undb([[pan_db / 2], [-pan_db / 2]])


def air():
    """Distant rumble and hiss from shaped noise, most alike at both ports in the bass; its level wanders."""
    mid, side = rng.standard_normal((2, N))
    mid = colour(mid, [(20, 8.0), (400, 5.0), (1500, 1.5), (16000, -10.0)])
    side = colour(side, [(20, 0.0), (120, -14.5), (400, -3.0), (1500, 5.5), (16000, -10.5)])
    x = colour(np.array([mid + side, mid - side]), AIR_SPECTRUM)
    x = x * undb(0.8 * walk(3) + 0.9 * walk(26))
    return x * undb(AIR_RMS_DB) / np.sqrt(np.mean(x ** 2)) * undb([[1.5], [-1.5]])


def scene():
    """Near sounds scattered and shaped by the microphone, plus bird, faint tone and air."""
    near = scatter(knocks() + rattle() + basin(), 0.041, WET_DB)
    bird = tone(BIRD, 0.0012, 1.2, 9.4)
    faint = tone(FAINT_TONE, 0.0006, 1.6, 0.64)
    return colour(near, MIC) + bird + faint + air()


def record(dry):
    """Drop the deepest bass, round the loudest peaks; steep low-pass at TOP_HZ, nothing is heard above it."""
    x = signal.sosfilt(signal.butter(2, 30, "high", fs=SR, output="sos"), dry)
    x = x / (1 + np.abs(x / .68) ** 4) ** .25
    return signal.sosfilt(signal.ellip(12, .2, 95, TOP_HZ, fs=SR, output="sos"), x)


dry = scene()
out = record(dry)
output_pcm(out)
```